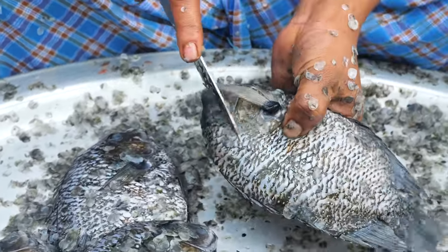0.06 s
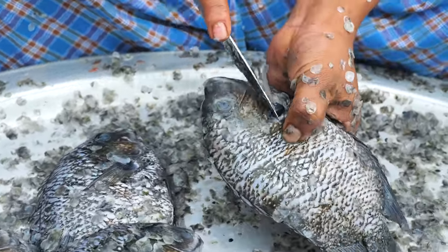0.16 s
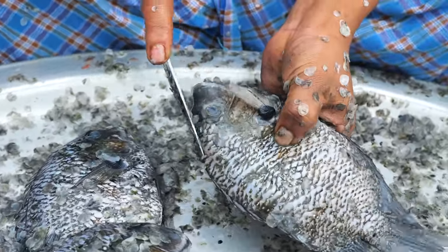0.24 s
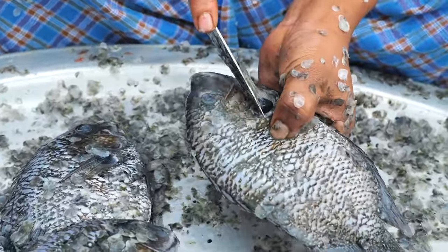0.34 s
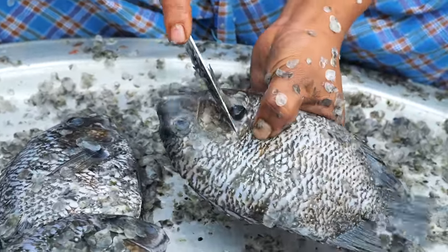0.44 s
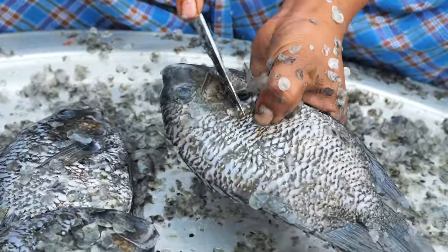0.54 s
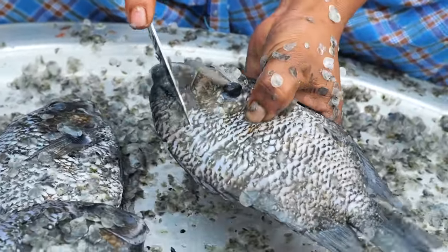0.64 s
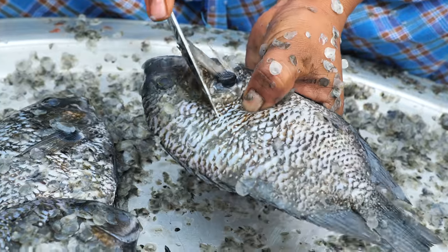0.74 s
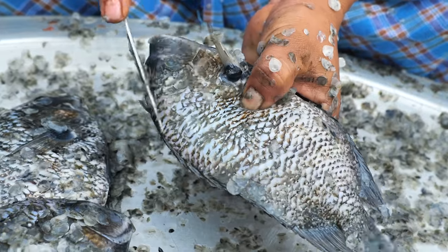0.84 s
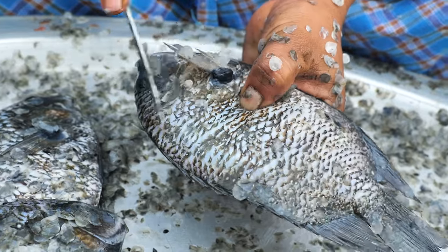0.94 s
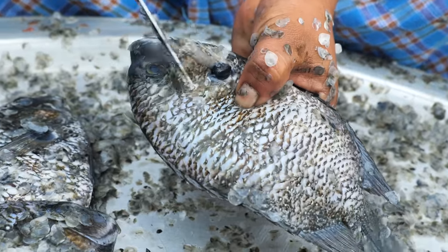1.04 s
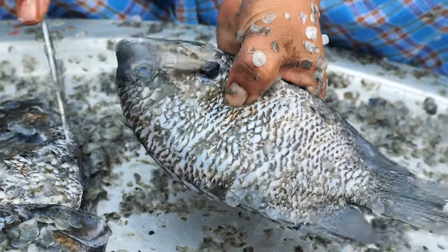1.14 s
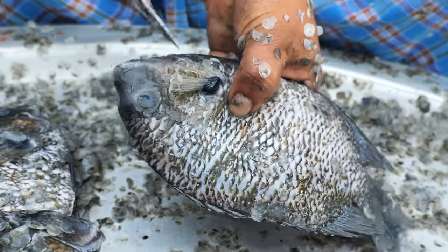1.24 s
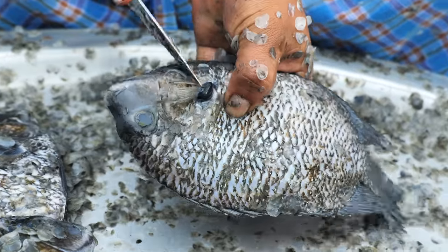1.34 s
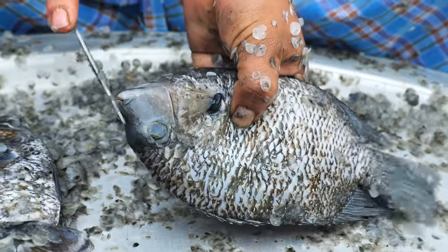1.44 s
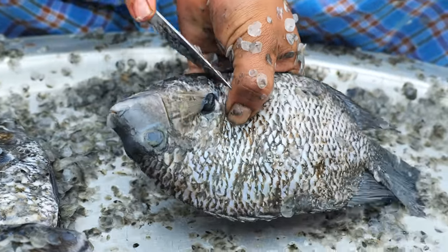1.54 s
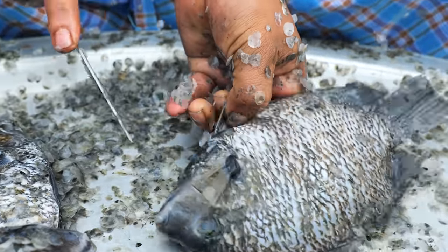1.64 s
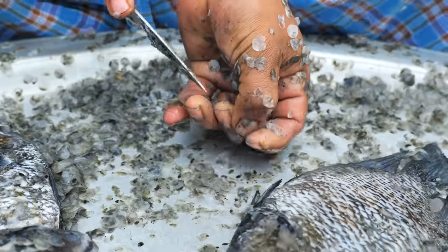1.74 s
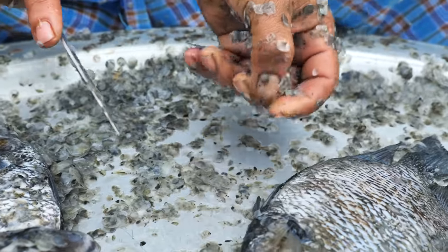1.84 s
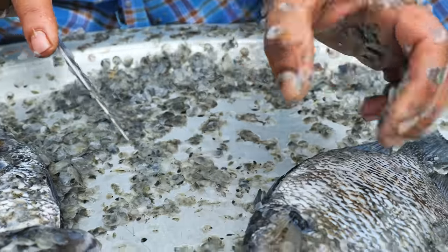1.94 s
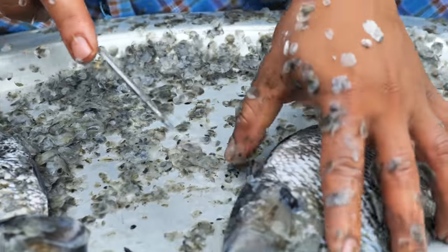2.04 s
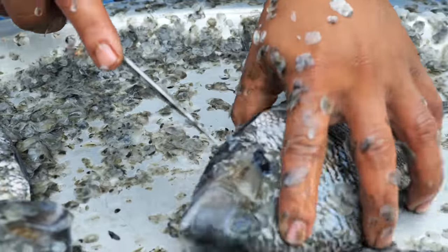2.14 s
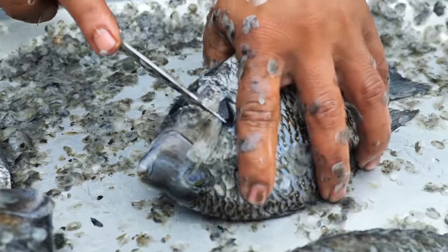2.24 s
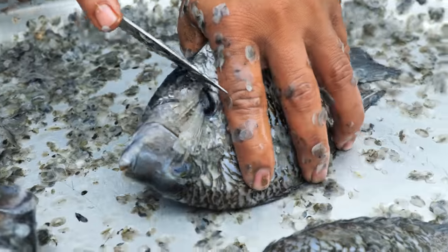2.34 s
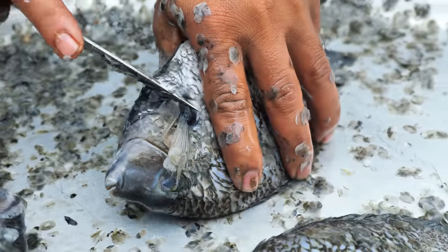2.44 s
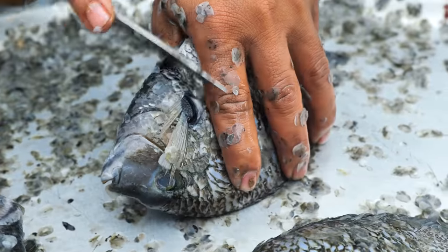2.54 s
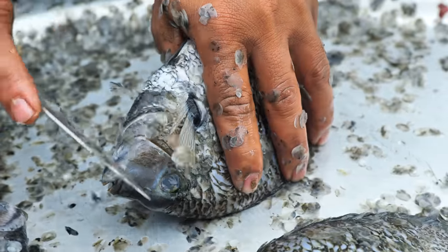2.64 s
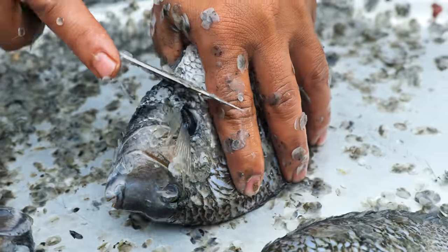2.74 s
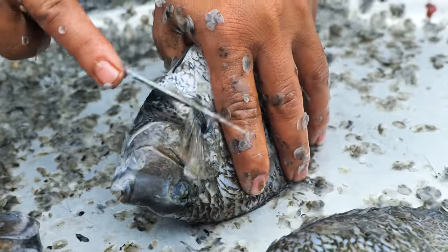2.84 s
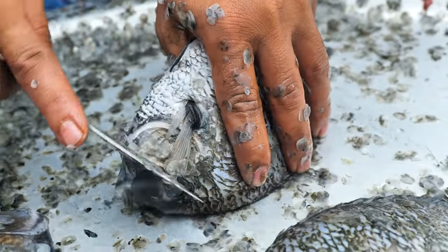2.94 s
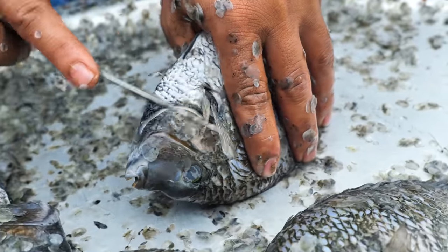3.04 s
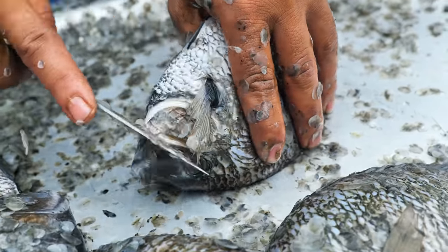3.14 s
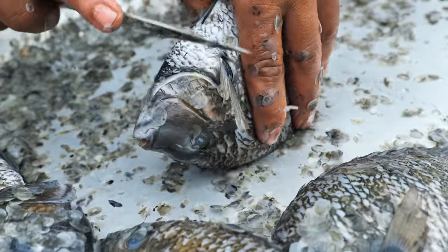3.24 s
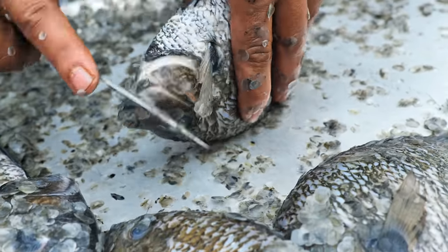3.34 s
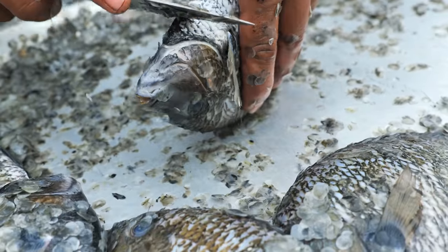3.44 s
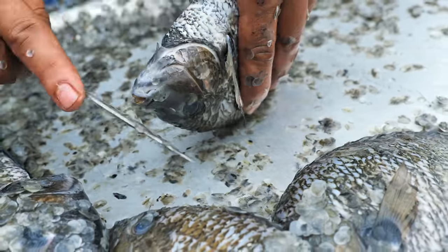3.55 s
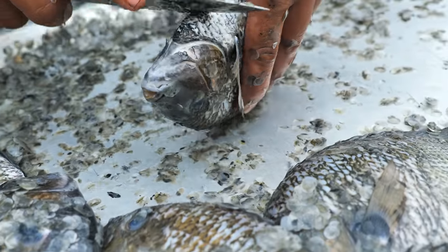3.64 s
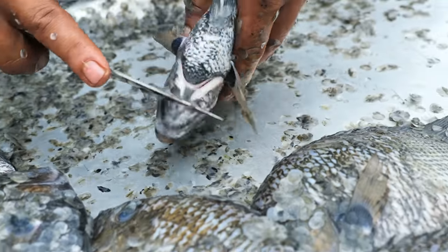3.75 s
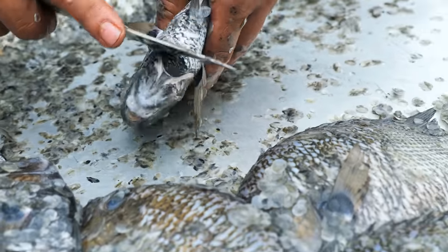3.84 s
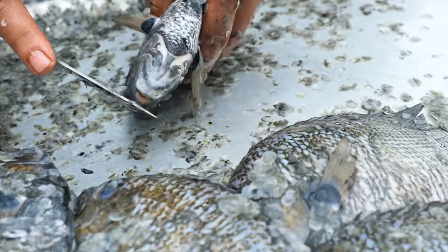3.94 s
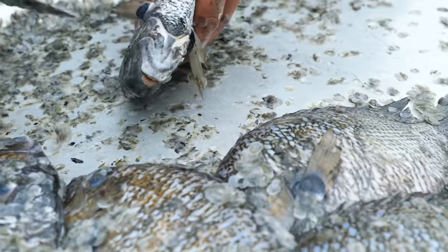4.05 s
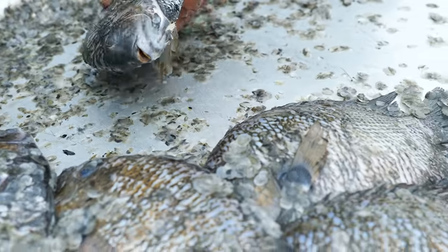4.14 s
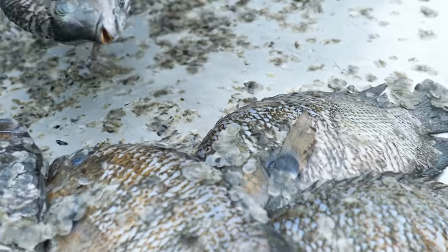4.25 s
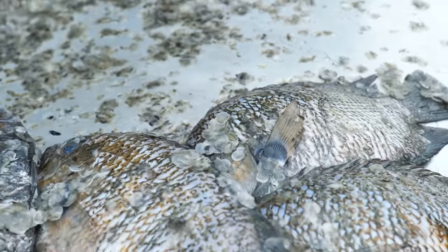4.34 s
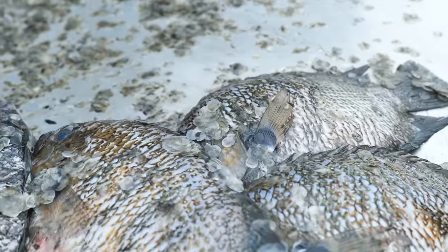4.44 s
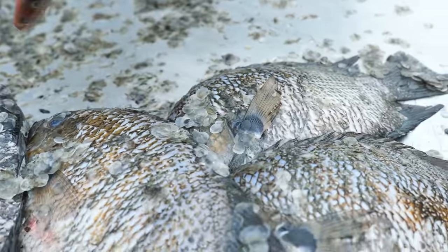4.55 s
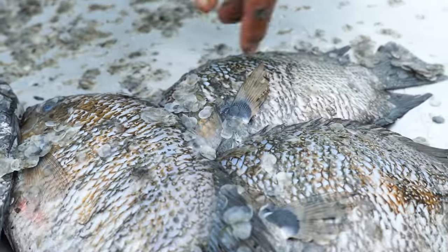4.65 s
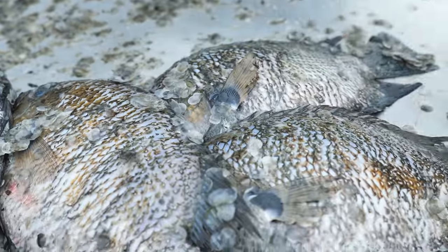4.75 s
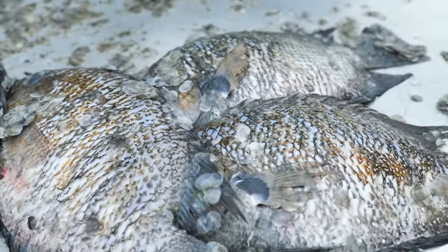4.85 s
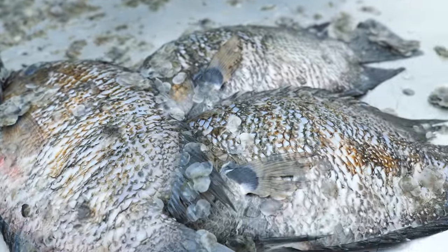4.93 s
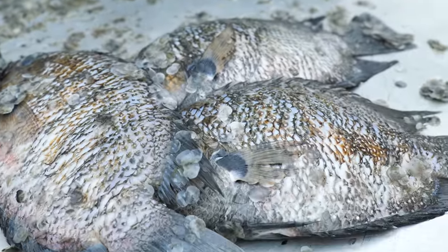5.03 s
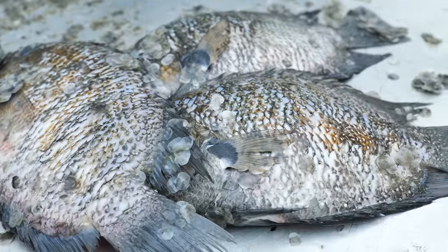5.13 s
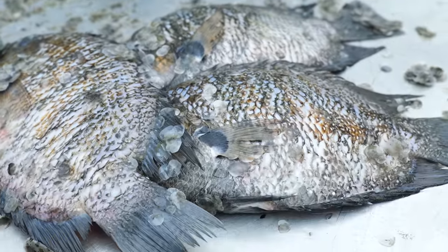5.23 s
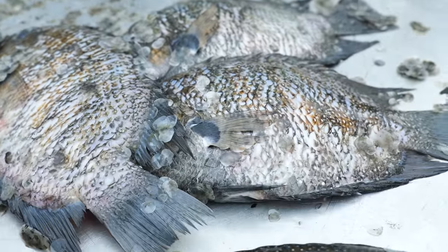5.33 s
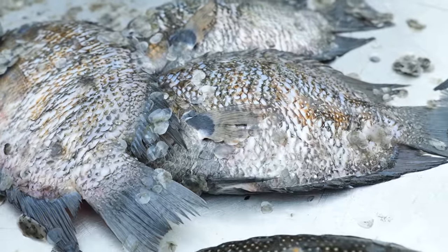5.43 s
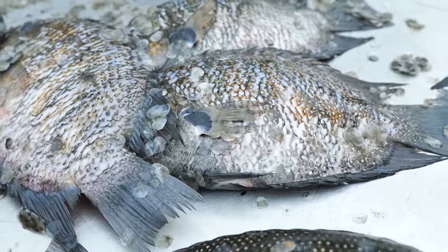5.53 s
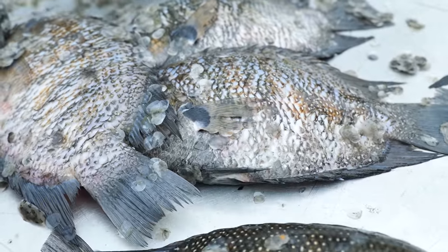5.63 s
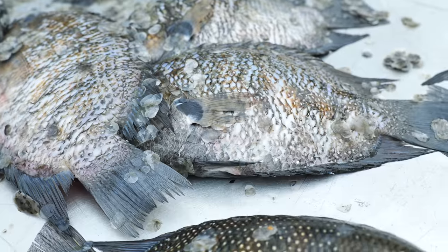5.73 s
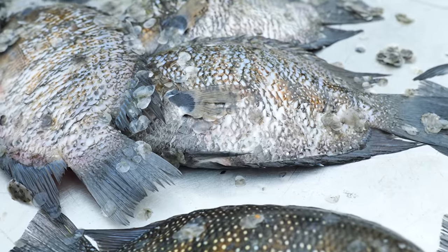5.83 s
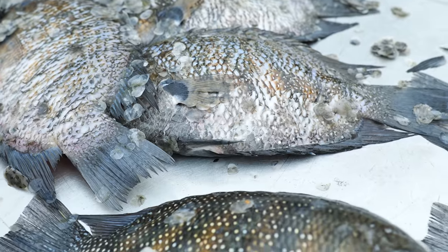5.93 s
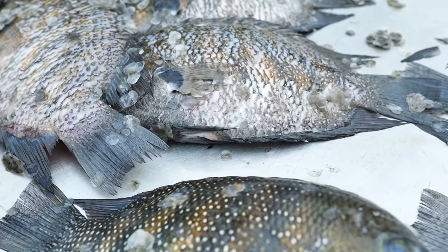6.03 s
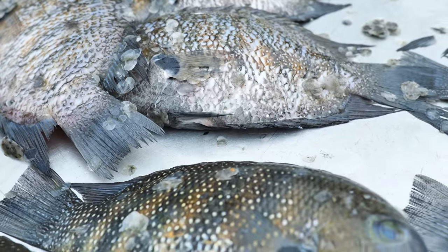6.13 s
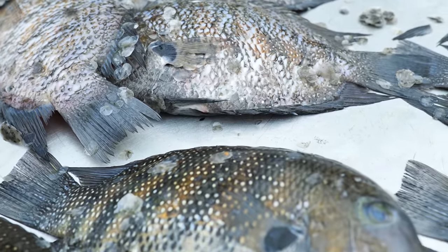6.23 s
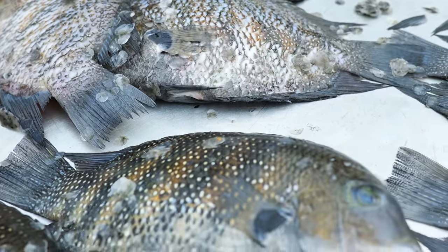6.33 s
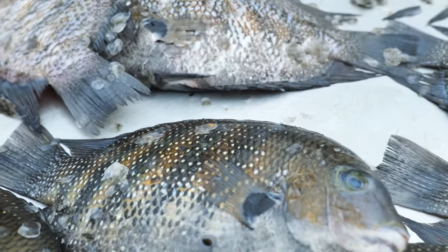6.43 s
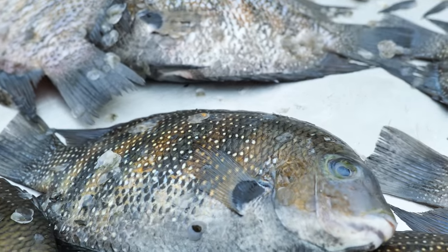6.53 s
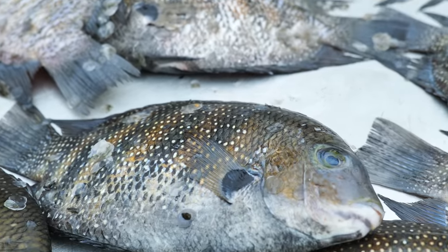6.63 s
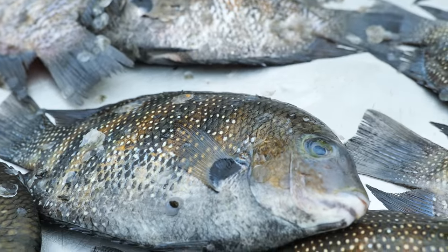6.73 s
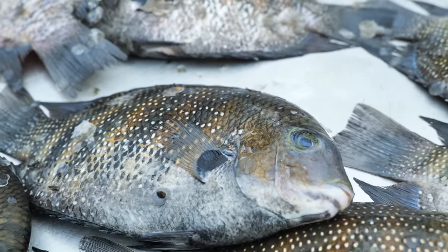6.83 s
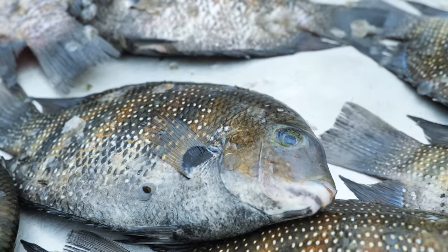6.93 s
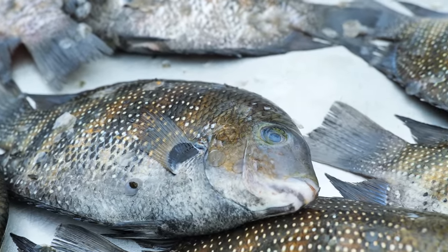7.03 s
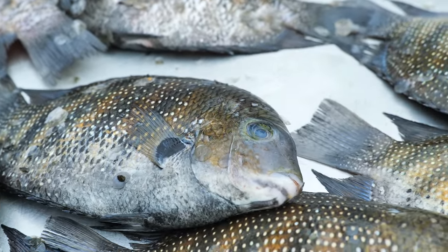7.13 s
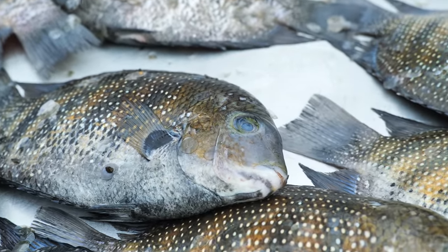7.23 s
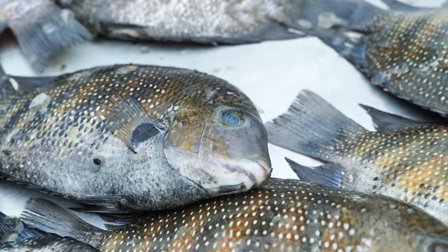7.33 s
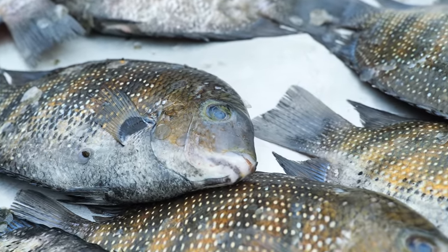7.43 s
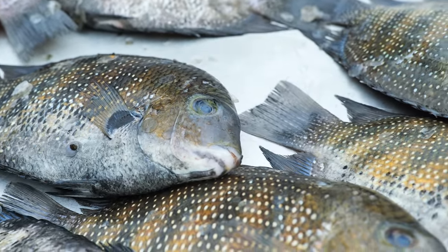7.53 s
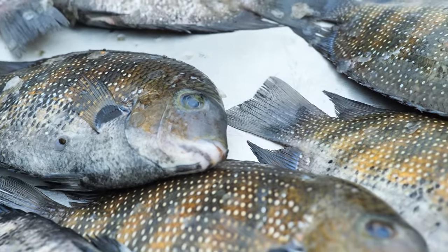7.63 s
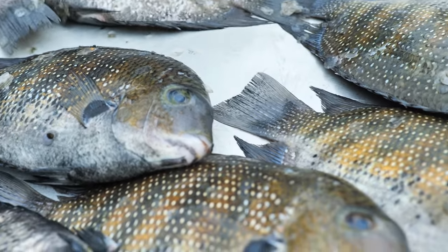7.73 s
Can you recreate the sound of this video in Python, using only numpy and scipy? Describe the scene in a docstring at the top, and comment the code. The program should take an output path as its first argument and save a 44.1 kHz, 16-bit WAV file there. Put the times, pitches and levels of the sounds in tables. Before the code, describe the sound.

A knife scales a wet fish over a metal tray, heard very close and dry, with a faint steady low rush behind. From 0 to 1.5 s short scratchy strokes come irregularly with brittle ticks, the sharpest snap at about 1.06 s. At 1.7 s the fish drops with a dull, cushioned thump and wet skin hisses softly until about 2.3 s. From 2.6 to 4 s the scraping is busier and crisper, with clusters of snaps near 2.85 and 3 s. Then it grows sparse: a hard tray clank with a scrape at 4.64 s, a faint hoarse squeak around 4.9 s, a slippery slide near 5.3 s. At 5.8 s another clank and thump, then from 6.1 s fast, regular, fuller rasps, roughly ten a second, mixed with snaps, fleshy bumps, pattering scales and a hollow knock at 7.44 s, until the end.

```python
"""Rasping knife strokes and snapping scales, as a fish is scaled over a metal tray close to the microphone.
Each stroke is a crowd of tiny scale flicks heard three ways: crisp at the edge, ringing in the blade, dull in the flesh.
Snaps are brief contacts that ring the blade, thumps are damped swings, and knocks set the tray's modes ringing.
Wet skin hisses and squeaks in between, and loose scales patter; around it lie weak reflections and a low rush."""
import sys
import numpy as np
from scipy import signal
from scipy.fft import rfft, irfft, next_fast_len
from scipy.io import wavfile

SR = 44100
rng = np.random.default_rng(int(sys.argv[2]) if len(sys.argv) > 2 else 0)


def transcribe(u):
    """Save the signal u as a 16-bit wav file named by the first command-line argument.

    u: samples, shape (n,) or (channels, n), limited to [-1, 1]; the rate is SR.
    q: integer samples, one column per channel.
    """
    v = np.clip(np.atleast_2d(u).T, -1, 1)
    q = np.round(v * 32767).astype(np.int16)
    wavfile.write(sys.argv[1], SR, q)


N = 343086
TIME = np.arange(N) / SR  # s, the whole scene
HIT = np.arange(4096) / SR  # s, one short hit
TOP_HZ = 15950  # upper limit of the recorder

# Knife strokes; depth is how far the blade bears into the flesh instead of skimming:
# start_s, rise_ms, length_ms, level_db (before the balance below), depth_db
STROKES = [(0.088, 59, 58, -44.5, -3), (0.214, 11, 16, -53, -6), (0.265, 44, 59, -41.5, -4),
           (0.34, 10, 22.4, -34.5, 10), (0.666, 30, 39, -44.5, 12), (0.827, 74, 75, -40.5, -4.5),
           (1.004, 20, 28.6, -39.5, -4), (1.055, 8.9, 14, -28, 0), (1.185, 19, 35, -46.5, -2),
           (1.457, 8, 30.3, -39, -5.5), (1.659, 7, 25, -41, 2), (2.211, 9.5, 35.5, -40, 10.5),
           (2.39, 22, 35, -57, -18), (2.455, 6, 26, -53.5, -19.5), (2.635, 21, 81, -35, -1),
           (2.825, 23, 47, -37, 8), (2.989, 31, 69, -31, 2), (3.198, 27, 40, -32.5, -3),
           (3.239, 9.9, 69, -41, 3), (3.304, 18, 41, -38, 1), (3.387, 30, 58, -33, 5),
           (3.515, 17, 25, -47.5, -1), (3.574, 26, 40, -31, 0.5), (3.749, 50.4, 47.6, -33.5, -3),
           (3.808, 10, 63, -43, 15), (3.932, 34, 31, -37, 2.5), (4.354, 19, 23, -48.5, -2),
           (4.627, 10, 26, -26, 5), (5.102, 5.5, 40, -41.5, 6), (5.705, 84, 48, -51, -1),
           (6.087, 65, 86, -39.5, 0.5), (6.189, 11, 17.4, -43, -17), (6.223, 5.4, 51, -36.5, 0.5),
           (6.302, 21, 63, -32.5, 6), (6.405, 15, 56, -44.5, 5.5), (6.489, 12, 81, -29, 13),
           (6.603, 6, 57, -41.5, -0.5), (6.706, 16, 63, -34, 3.5), (6.792, 28, 93, -46, 1),
           (6.89, 21, 81, -34, 1), (7.0, 27, 66, -42, -1), (7.102, 19, 77, -37.5, -2.5),
           (7.207, 21, 79, -42, 2), (7.295, 18, 70, -39.5, 1), (7.388, 61, 81, -42.5, 4),
           (7.475, 22, 54, -33.5, 5.5), (7.585, 22, 57, -47, -2), (7.654, 39, 60, -41.5, 2),
           (7.757, 15, 29, -48.5, -8)]
# Balance against the blade, one row per grip (held up, pressed down, on its flank):
# edge_db, flesh_db, sizzle_db, snap_flesh_db
GRIP_BALANCE = [(2, 1.5, -0.5, -4), (-5, 0, -2, -4.5), (1, 3, -0.5, 2)]
# scales flicked per second, spread of their size, and plain rubbing against them (ratio)
FLICKS_PER_S, FLICK_SPREAD_DB, RUB = 2400, 4.5, .55


def strokes(grips, start_db=-6, end_db=-10, rows_db=1.0, sizzle_hz=8000, blade_db=0.0):
    """The edge runs over rows of scales; pressure swells and eases, and the flicks come in clusters."""
    out = np.zeros(N)
    for start, rise_ms, length_ms, db, depth_db in STROKES:
        grip = grip_at(start)
        edge_db, flesh_db, sizzle_db, _ = GRIP_BALANCE[grip]
        size = next_fast_len(int((length_ms / 1000 + .03) * SR))
        ms = np.arange(size) * 1000 / SR
        # sorted, because a slow rise may outlast the stroke's length
        corners_ms = np.sort([0, 1, rise_ms, length_ms, length_ms + 10])
        pressure = undb(np.interp(ms, corners_ms, [-30, start_db, 0, end_db, -45]))
        rasp = flicks(size, per_s=FLICKS_PER_S, spread_db=FLICK_SPREAD_DB)
        rasp = rasp + RUB * rng.standard_normal(size)
        rows = undb(rows_db * walk(rate=410, size=size))
        rasp = mottle(rasp * pressure * rows, depth_db=4.0, rate=91.8)
        # a flatter blade skims the scales and sizzles more
        treble = signal.butter(2, sizzle_hz, "high", fs=SR, output="sos")
        rasp = rasp + (undb(sizzle_db) - 1) * signal.sosfiltfilt(treble, rasp)
        # a deeper stroke moves the sound from the edge into the flesh
        shares_db = (edge_db - depth_db / 2, blade_db, flesh_db + depth_db / 2)
        loudness = np.sqrt(np.mean(pressure ** 2))
        for path, share_db in zip(grips[grip], shares_db):
            add(out, start, unit(through(rasp, path)) * loudness * undb(db + share_db))
    return out


def flicks(size, per_s, spread_db):
    """Tiny clicks at random moments: many small, a few large."""
    sizes = undb(spread_db * np.minimum(rng.exponential(size=size), 4))
    struck = rng.random(size) < per_s / SR
    return unit(struck * sizes * rng.choice([-1, 1], size) + 1e-9)


def mottle(x, depth_db, rate):
    """Every scale has its own size, so each third of an octave swells and fades on its own."""
    padded = 2 * len(x)
    spectrum = rfft(x, padded)
    hz = np.maximum(np.fft.rfftfreq(padded, 1 / SR), 1)
    # third-octave steps above 800 Hz; the outermost bands take everything beyond them
    place = np.clip(3 * np.log2(hz / 800), 0, 13)
    overlap = np.maximum(1 - abs(place - np.arange(14)[:, None]), 0)
    bands = irfft(spectrum * overlap)[:, :len(x)]
    return sum(band * undb(depth_db * walk(rate, len(x))) for band in bands)


# Colours of the three paths to the microphone, edge, blade and flesh: freq_hz, level_db
EDGE_COLOUR = [(1200, -39.5), (2600, -8.5), (3800, 0), (5400, 1.5), (7000, -2.5), (8200, -6),
               (10500, -10.5), (13000, -15), (16000, -17)]
BLADE_COLOUR = [(450, -20.5), (750, -2.5), (1000, 1.5), (1250, -4.5), (1850, 2), (2500, -3.5),
                (3300, -14.5), (5000, -22)]
FLESH_COLOUR = [(30, -37.5), (70, -9.5), (130, -0.5), (210, -1), (300, 0.5), (480, -2.5), (700, -8),
                (1100, -7.5), (2500, -46.5)]


def knife(grip):
    """Responses of the edge, the blade and the flesh, with the resonances of one grip."""
    paths = [response(colour) for colour in (EDGE_COLOUR, BLADE_COLOUR, FLESH_COLOUR)]
    return [h + sum(undb(db) * resonate(h, hz, width) for hz, width, db in grip) for h in paths]


# Moments when the grip on the fish changes: time_s
GRIP_CHANGES = [1.7, 5.5]


def grip_at(s):
    """Which grip holds the fish at time s."""
    return np.searchsorted(GRIP_CHANGES, s)


# The loudest scales snapping off; level is that of the blade, crispness the edge against the blade:
# time_s, level_db, crispness_db, blade_pitch_hz
SNAPS = [(0.074, -33, -14, 2530), (0.092, -46, 5, 1300), (0.134, -39.5, 3.5, 1930),
         (0.346, -30.5, 2.5, 1800), (0.394, -33.5, -7.5, 1740), (0.455, -47, 5.5, 1960),
         (0.537, -46.5, 4, 2080), (0.633, -38.5, -4.5, 2480), (0.684, -29.5, 3, 1680),
         (0.698, -35, 4, 1280), (0.814, -37.5, -10, 1830), (0.899, -27.5, -15, 1950),
         (0.931, -36, -10, 1840), (0.947, -33.5, -12.5, 1830), (1.063, -17.5, -6, 3050),
         (1.15, -39, -14, 1950), (1.197, -32.5, -1, 1830), (1.21, -28.5, -21, 1650),
         (1.471, -42.5, 4, 1930), (1.479, -32, 5.5, 1720), (1.67, -32.5, 1.5, 1900),
         (2.183, -45.5, -5, 1890), (2.636, -37.5, 2.5, 1760), (2.671, -31, 8.5, 1770),
         (2.682, -31, -20, 2140), (2.7, -28.5, -4.5, 1950), (2.816, -34, -6, 1780),
         (2.839, -21.5, -18, 1600), (2.844, -20.5, 3.5, 1710), (2.861, -23, -12, 1830),
         (2.996, -26, -4.5, 1850), (3.004, -23, -5, 1520), (3.053, -25, -4.5, 1870), (3.22, -33, -3, 1650),
         (3.254, -25.5, 2, 1860), (3.3173, -23.5, -2, 1220), (3.434, -34, -8, 2240),
         (3.593, -22.5, -5.5, 1680), (3.784, -22, -9.5, 1810), (3.829, -50, 5, 1800),
         (3.959, -30.5, -10, 1780), (4.006, -29, -2, 2350), (4.813, -31.5, -10.5, 1340),
         (5.023, -39, -16, 2040), (5.762, -37, -4, 2000), (6.145, -24.5, -7, 1850), (6.193, -32, 3, 1800),
         (6.334, -36, 9, 2010), (6.516, -21.5, -3.5, 1790), (6.536, -28, 2, 1320), (6.549, -34, 5.5, 2270),
         (6.564, -31.5, 8.5, 2020), (6.73, -28.5, -0.5, 1860), (6.892, -30, -20, 1910),
         (6.913, -26.5, 3, 2000), (6.923, -26.5, -1, 1900), (6.958, -32.5, 0.5, 1260),
         (7.167, -36, 6, 2160), (7.221, -46, 16, 1730)]
SNAP_MS, EDGE_HZ = 2.52, 5160  # typical contact time and typical brief ring of the edge
STRAIN_S, STRAIN_DB = 0.0025, -21.5  # a scale creaks as it bends, just before it lets go
LEAD = 512  # samples of creak ahead of a snap


def snaps(grips, edge_ring=0.84, blade_ring=2.3, edge_scatter=0.039, length_scatter=0.083):
    """A scale bends, lets go and ticks the blade; where it is held sets the pitch of the brief ring."""
    out, events = np.zeros(N), SNAPS + small_snaps()
    chance = rng.standard_normal((len(events), 2))
    for (s, db, crisp_db, blade_hz), (long, bright) in zip(events, chance):
        grip = grip_at(s)
        growth = np.exp(-HIT[:LEAD][::-1] / STRAIN_S)
        strain = undb(STRAIN_DB) * rng.standard_normal(LEAD) * growth
        release = contact(SNAP_MS * np.exp(length_scatter * long), first=1.3)
        push = np.concatenate([strain, release])
        edge, blade, flesh = (through(push, path) for path in grips[grip])
        edge_hz = EDGE_HZ * np.exp(edge_scatter * bright)
        edge = edge + edge_ring * resonate(edge, edge_hz, width_hz=260)
        blade = blade + blade_ring * resonate(blade, blade_hz, width_hz=124)
        flesh_db = GRIP_BALANCE[grip][-1]
        snap = undb(crisp_db) * blow(edge) + blow(blade) + undb(flesh_db) * blow(flesh)
        add(out, s - LEAD / SR, undb(db) * snap)
    return out


def small_snaps(below_db=-6, scatter_db=2.0, crisp_db=2.0, blade_hz=1870, pitch_scatter=0.15):
    """Every stroke tears off one more scale at a random point along it: rows like those of SNAPS."""
    rows, chance = [], rng.standard_normal((len(STROKES), 3))
    for (start, _, length_ms, db, depth_db), (when, size, high) in zip(STROKES, chance):
        along = (1 + np.tanh(when / 2)) / 2  # 0 to 1, mostly near the middle
        s = start + along * length_ms / 1000
        level_db = db + below_db + scatter_db * size
        rows.append((s, level_db, crisp_db - depth_db / 2, blade_hz * np.exp(pitch_scatter * high)))
    return rows


# The fish bumps on the tray: time_s, level_db (before the trim and the wobble), pitch_hz
THUMPS = [(1.7209, -8.5, 296), (1.766, -22.5, 282), (3.051, -21, 302), (3.065, -25, 167),
          (3.607, -21.5, 199), (3.808, -19.5, 320), (4.637, -14.5, 244), (4.645, -13.5, 165),
          (5.787, -9.5, 281), (5.8, -21, 200), (6.063, -20.5, 233), (6.145, -13, 229), (6.159, -25, 185),
          (6.279, -21.5, 242), (6.332, -9, 306), (6.502, -16, 284), (6.517, -13.5, 290), (6.537, -10, 270),
          (6.715, -19.5, 296), (6.744, -22, 270), (6.853, -21, 240), (6.914, -16.5, 523),
          (7.44, -12.5, 470)]


def thumps(rise_s=0.0025, fall_s=0.0022, wobble_s=0.012, wobble_db=-8, trim_db=-3, low_hz=110):
    """Soft flesh lands: heavily damped swings and a dull wobble; so small a body radiates little bass."""
    out, flesh = np.zeros(N), response(FLESH_COLOUR)
    bass_cut = signal.butter(2, low_hz, "high", fs=SR, output="sos")
    for s, db, hz in THUMPS:
        envelope = (1 - np.exp(-HIT / rise_s)) * np.exp(-HIT / fall_s)
        swing = signal.sosfilt(bass_cut, np.sin(2 * np.pi * hz * HIT) * envelope)
        wobble = through(rng.standard_normal(len(HIT)) * np.exp(-HIT / wobble_s), flesh)
        add(out, s, undb(db + trim_db) * (blow(swing) + undb(wobble_db) * blow(wobble)))
    return out


# Hard knocks on the tray; ring_db sets rattle and ring together, before their own levels:
# time_s, contact_ms, clank_db, tone_db, tone_hz, ring_db, contact_cutoff_hz
KNOCKS = [(1.063, 4, -41, -32, 440, -55, 9000), (1.722, 3.2, -21, -27, 690, -37, 990),
          (4.6354, 7.9, -16.5, -17.5, 2070, -27.5, 9000), (4.645, 2.3, -21.5, -19, 2100, -41, 7000),
          (5.783, 2.4, -37, -38, 980, -62, 7000), (5.787, 3.9, -14, -26, 1340, -41, 7260),
          (5.799, 10, -29, -35, 1500, -52, 4000), (6.679, 4.7, -20, -31, 2330, -36.5, 5000),
          (7.438, 16, -35, -19.5, 1045, -41, 2500), (7.482, 18, -45, -36, 1100, -57, 2500)]
# Modes in which the tray rings on: freq_hz, level_db (relative), t60_s
TRAY_MODES = [(625, -1, 0.69), (720, 1.5, 0.54), (795, -2, 1), (1314, 1, 0.62), (2020, -5, 0.59),
              (2440, -7, 1), (2980, -22, .42), (3160, -10, 0.76)]
# Colour of the tray's clank and rattle: freq_hz, level_db
CLANK_COLOUR = [(100, -7), (250, -9.5), (450, 5), (640, 9.5), (830, -0.5), (1500, 2), (2300, 0.5),
                (3500, -4.5), (6000, -8.5), (9000, -16.5), (16000, -23)]


def knocks(rattle_db=-4, ring_db=-13, rattle_s=0.047, rattle_hz=2400):
    """The loaded tray clanks with a short tone of the struck spot, rattles dully and rings in weak modes."""
    out, t, colour = np.zeros(N), TIME[:SR // 2], response(CLANK_COLOUR)
    dull = signal.butter(1, rattle_hz, fs=SR)
    for s, ms, db, tone_db, hz, tail_db, soft_hz in KNOCKS:
        # flesh cushions the blow: the softer the contact, the duller the clank
        cushion = signal.butter(2, min(soft_hz, TOP_HZ), fs=SR)
        clank = through(signal.lfilter(*cushion, contact(ms, first=2.9)), colour)
        tone = resonate(clank, hz, width_hz=118)
        add(out, s, undb(db) * blow(clank) + undb(tone_db) * blow(tone))
        # the rattle and the ring are both the tray's own motion, so they grow together
        rattle = signal.lfilter(*dull, through(rng.standard_normal(len(t)), colour))
        rattle = unit(rattle) * np.exp(-t / rattle_s)
        ring = np.zeros(len(t))
        for mode_hz, mode_db, t60_s in TRAY_MODES:
            fade_db = mode_db - 60 * t / t60_s + 3 * walk(rate=110, size=len(t))
            ring += np.sin(2 * np.pi * mode_hz * t) * undb(fade_db)
        add(out, s, undb(tail_db) * (undb(rattle_db) * rattle + undb(ring_db) * ring))
    return out


def slide(smooth=1.6, width_octaves=1.3):
    """Wet skin slips over skin and tray: a soft, broad hiss with a little sticky crackle."""
    db, hz = sliding()
    grain = flicks(N, per_s=400, spread_db=7.5) + smooth * rng.standard_normal(N)
    out = np.zeros(N)
    for centre in 1000 * 2 ** (np.arange(8) / 2):  # half-octave bands
        edges = [centre / 2 ** .25, centre * 2 ** .25]
        band = signal.sosfilt(signal.butter(3, edges, "band", fs=SR, output="sos"), grain)
        nearness = np.exp(-(np.log2(centre / hz) / width_octaves) ** 2)
        out += unit(band) * nearness * undb(walk(rate=40, size=N))
    return unit(out) * undb(db)


# Wet skin slides: peak_s, rise_s, fall_s, level_db, centre_hz (at the peak)
SLIDES = [(1.79, 0.18, 0.13, -45.5, 3380), (2.125, .06, 0.071, -47.5, 3360), (2.27, 0.16, 0.13, -52, 3950),
          (5.27, 0.43, 0.4, -49.5, 3800), (5.7, .4, .4, -58, 5530), (6.05, .2, 0.55, -50, 3500)]
# drop at the ends of rise and fall; the centre moves with time through each slide
SLIDE_FADE_DB, SLIDE_OCTAVES_PER_S = 24, 2.3
HANDLING_DB, HANDLING_HZ = -63.5, 3500  # faint slither of the fish in the hand between slides


def sliding():
    """Level and centre of the skin's hiss: slides swell and fade, and the power-weighted centre moves."""
    power = undb(HANDLING_DB) ** 2
    octave = power * np.log2(HANDLING_HZ)
    for s, rise_s, fall_s, db, hz in SLIDES:
        away = np.maximum((s - TIME) / rise_s, (TIME - s) / fall_s)
        share = undb(db - SLIDE_FADE_DB * away) ** 2
        power = power + share
        octave = octave + share * (np.log2(hz) + SLIDE_OCTAVES_PER_S * (TIME - s))
    return 10 * np.log10(power), 2 ** (octave / power)


# Wet skin squeaks: start_s, end_s, start_hz, end_hz, level_db
SQUEAKS = [(2.544, 2.646, 1950, 2200, -58), (4.086, 4.214, 4030, 3900, -69),
           (4.905, 5.026, 1990, 2390, -55.5)]


def squeaks(width_hz=170):
    """Wet skin sticks and slips: a faint, hoarse tone that glides."""
    out = np.zeros(N)
    for start, end, from_hz, to_hz, db in SQUEAKS:
        size = int(abs(end - start) * SR)
        hz = np.linspace(from_hz, to_hz, size) + width_hz * walk(rate=700, size=size)
        tone = np.sin(2 * np.pi * np.cumsum(hz) / SR)
        swell = np.hanning(size) ** .5 * undb(4.1 * walk(rate=197, size=size))
        add(out, start, undb(db) * unit(tone * swell))
    return out


def loose_scales(level_db=-66, settle_s=0.1):
    """Scales flung off by each stroke patter down and settle, ticking at six pitches for their sizes."""
    flung = np.zeros(N)
    for start, _, _, db, _ in STROKES:
        add(flung, start, undb([db]))
    busy = np.sqrt(signal.lfilter([1], [1, -np.exp(-1 / (settle_s * SR))], flung))
    drops = np.zeros(N)
    for hz in (2300, 3300, 4500, 5600, 7400, 9200):
        drops += resonate(flicks(N, per_s=25, spread_db=4) * busy, hz, width_hz=1200)
    return undb(level_db) * unit(drops)


def room(x, t60_s=0.17, wet_db=-19):
    """Weak, dull reflections from the surroundings."""
    t = TIME[:SR // 2]
    tail = rng.standard_normal(len(t)) * undb(-60 * t / t60_s) * (t > .004)
    dull = response([(100, 10.0), (500, 5), (2000, -1), (6000, -21), (15000, -42)])
    tail = through(tail / np.sqrt(np.sum(tail ** 2)), dull)
    return x + undb(wet_db) * through(x, tail)


# Colour of the background rush around the microphone: freq_hz, level_db
AIR_COLOUR = [(15, -63), (25, -17.5), (92, -1), (242, -2.5), (326, -4), (354, -3.5), (531, -7), (591, -7.5),
              (911, -9.5), (1070, -11.5), (1370, -12.5), (1940, -15), (3920, -27.5), (16000, -43.5)]
AIR_DB = -49  # level the rush wavers about


def air():
    """A low, steady background rush that wavers a little."""
    rush = unit(through(rng.standard_normal(N), response(AIR_COLOUR, size=8192)))
    waver_db = walk(rate=8, size=N)
    return rush * undb(AIR_DB + waver_db)


def undb(db):
    """Decibels to gain."""
    return 10 ** (np.asarray(db) / 20)


def unit(x):
    """Scale to rms 1."""
    return x / np.sqrt(np.mean(x ** 2))


def blow(x):
    """Scale a hit to the energy of 5 ms at rms 1."""
    return x / np.sqrt(np.sum(x ** 2) / (.005 * SR))


def add(out, s, x):
    """Mix x into out from time s."""
    i = max(int(s * SR), 0)
    out[i:i + len(x)] += x[:max(len(out) - i, 0)]


def response(points, size=2048):
    """Causal, minimum-phase impulse response with the given (Hz, dB) colour."""
    hz, db = np.transpose(points)
    f = np.maximum(np.fft.rfftfreq(size, 1 / SR), 1)
    colour_db = np.interp(np.log(f), np.log(hz), db)
    # beyond the outer points it falls 24 dB per octave above and 12 below
    colour_db = colour_db - 24 * np.maximum(np.log2(f / hz[-1]), 0)
    colour_db = colour_db - 12 * np.maximum(np.log2(hz[0] / f), 0)
    cepstrum = irfft(np.log(undb(colour_db)))
    # folding the cepstrum forward makes the response causal
    cepstrum[1:size // 2] *= 2
    cepstrum[size // 2 + 1:] = 0
    return irfft(np.exp(rfft(cepstrum)))


def through(x, h):
    """Filter x with an impulse response."""
    return signal.fftconvolve(x, h)[:len(x)]


def resonate(x, hz, width_hz):
    """One resonance, gain 1 at its centre."""
    peak = signal.iirpeak(min(hz, .45 * SR), hz / width_hz, fs=SR)
    return signal.lfilter(*peak, x)


def walk(rate, size):
    """Random wander in straight lines between normal draws, rate of them per second."""
    steps = np.arange(size) * rate / SR
    count = int(steps[-1]) + 2
    return np.interp(steps, np.arange(count), rng.standard_normal(count))


def contact(ms, first=3.0):
    """A first click and a rough contact that decays with time constant ms."""
    push = rng.standard_normal(len(HIT)) * np.exp(-HIT * 1000 / max(ms, .2))
    push[0] += first
    return push


# Resonances of knife and fish in each grip: freq_hz, width_hz, level_db
HELD_UP = [(433, 33, 4), (740, 97, 3), (1940, 260, -11), (2930, 180, -7.5), (6600, 2100, -4.5)]
PRESSED_DOWN = [(950, 330, -4.5), (1590, 120, -17), (5340, 270, -3), (9140, 200, 5), (11700, 240, -2)]
ON_FLANK = [(225, 88, 11.5), (440, 210, 7), (1020, 110, -2), (2070, 260, -10), (4870, 190, -6.5)]


def scene():
    """Knife, fish and tray close by, over the background."""
    grips = [knife(grip) for grip in (HELD_UP, PRESSED_DOWN, ON_FLANK)]
    work = strokes(grips) + snaps(grips) + thumps() + knocks()
    work = work + slide() + squeaks() + loose_scales()
    return (room(work) + air())[None]


def record(dry):
    """The recorder rounds the highest peaks and cuts the top."""
    soft = .75 * np.tanh(dry / .75)
    return signal.sosfilt(signal.ellip(10, .2, 70, TOP_HZ, fs=SR, output="sos"), soft)


dry = scene()
out = record(dry)
transcribe(out)
```